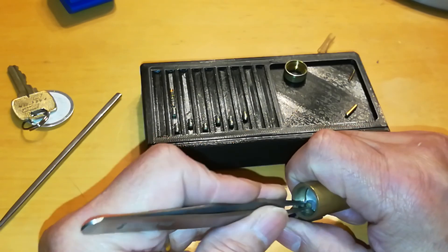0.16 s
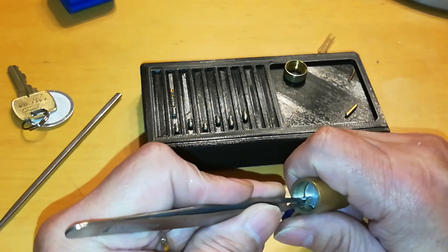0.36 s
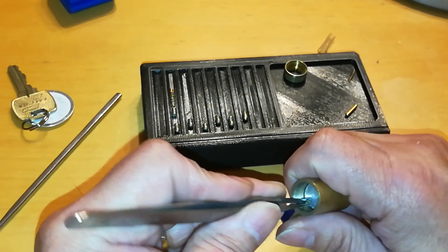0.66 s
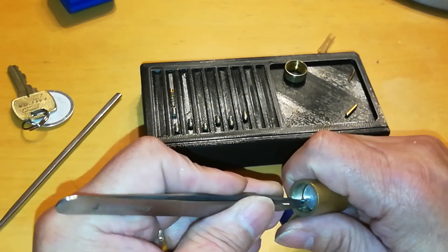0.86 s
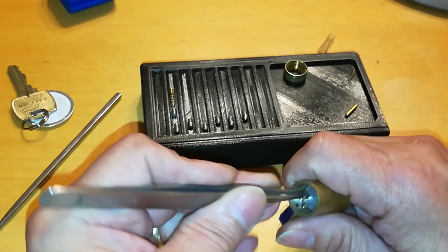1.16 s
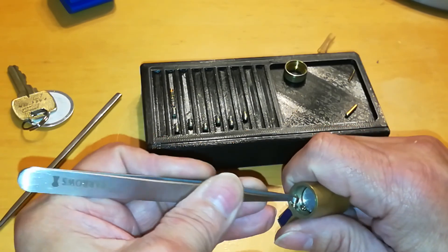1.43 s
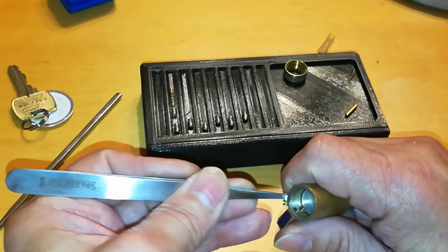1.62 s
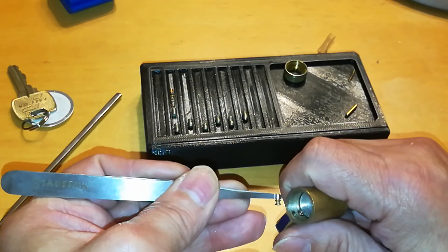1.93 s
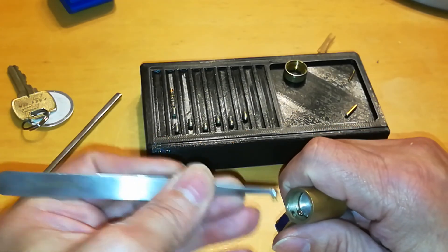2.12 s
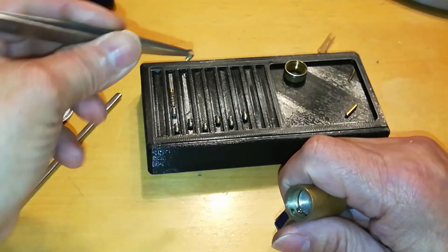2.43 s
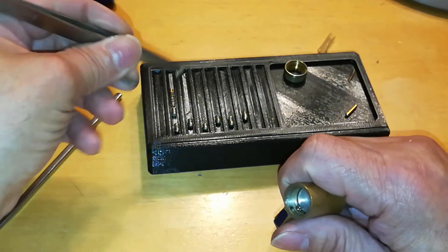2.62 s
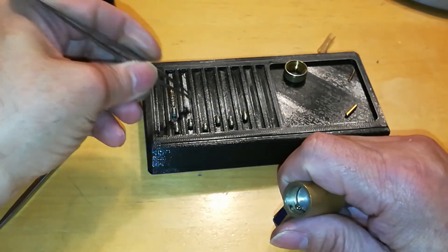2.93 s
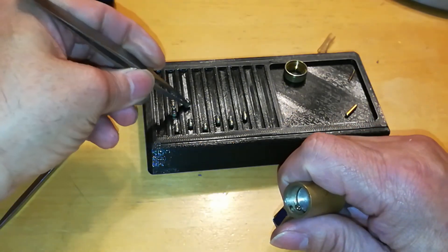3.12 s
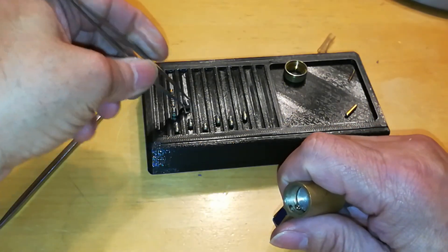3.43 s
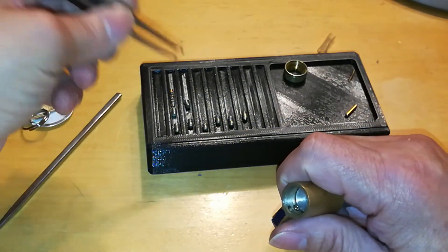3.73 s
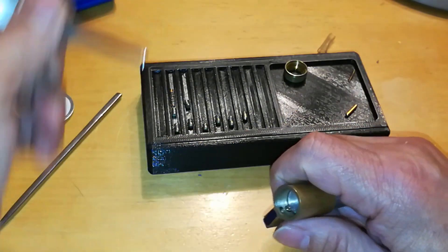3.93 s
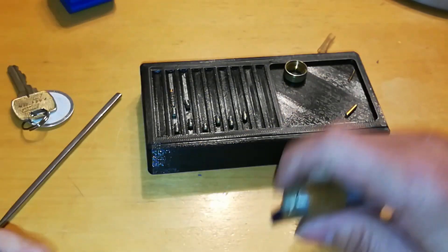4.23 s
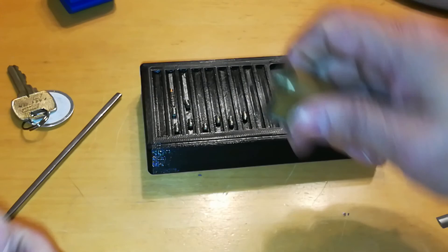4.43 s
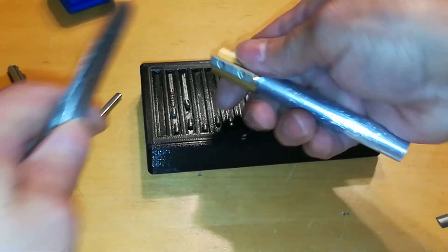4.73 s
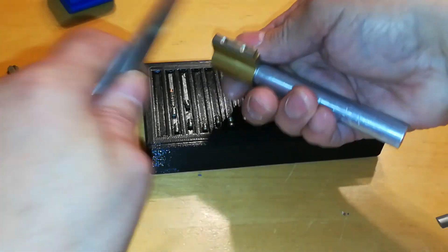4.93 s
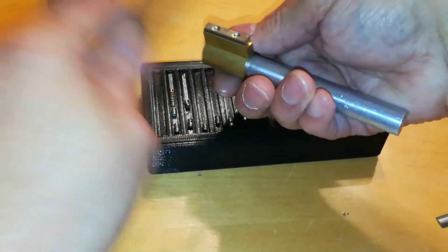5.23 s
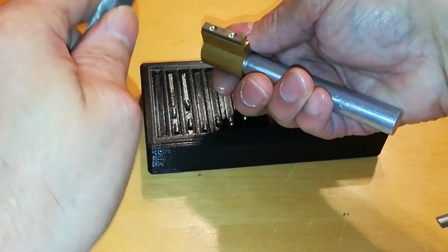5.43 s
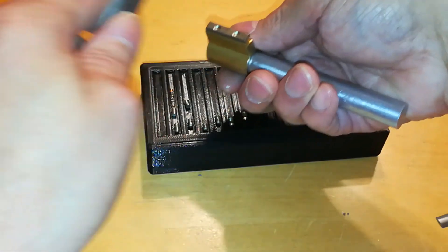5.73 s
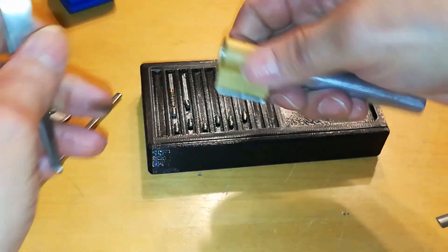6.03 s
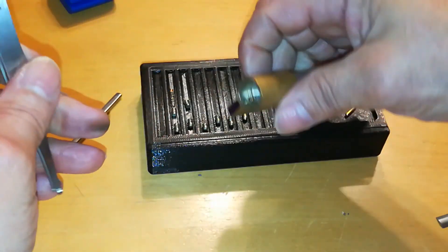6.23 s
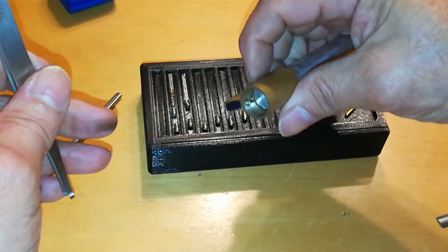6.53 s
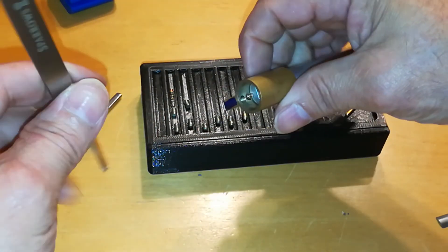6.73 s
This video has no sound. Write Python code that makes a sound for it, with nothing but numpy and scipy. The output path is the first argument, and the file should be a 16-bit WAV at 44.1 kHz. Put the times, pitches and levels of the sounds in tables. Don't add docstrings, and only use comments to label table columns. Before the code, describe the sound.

Close handling of tiny metal pins with steel tweezers in a small quiet room. Over low mains hum and hiss come faint ticks, one sharp knock on a wooden table, skin rustle and a pin bouncing in a hollow plastic tray. Near the end a thin bright click precedes two extremely loud steel snaps with short room tails, then near silence.

```python
import sys
import numpy as np
from scipy import signal
from scipy.fft import rfft, irfft
from scipy.io import wavfile

SR = 44100
rng = np.random.default_rng(int(sys.argv[2]) if len(sys.argv) > 2 else 0)


def waveform_to_disk(signal):
    frames = np.transpose(np.atleast_2d(signal))
    scaled = np.clip(frames, -1, 1) * 32767
    samples = np.round(scaled).astype(np.int16)
    wavfile.write(sys.argv[1], SR, samples)


def elevation(decibels):
    levels = np.asarray(decibels, float)
    return 10 ** (levels / 20)


N = 302526

# (frequency [Hz], side minus mid [dB])
SIDE_WIDTH = [(60, -20.5), (130, -8.5), (290, -5.5), (640, 7), (1410, -4), (3100, 2), (6820, 0), (15000, 1)]
# (time [s], peak [dB], left minus right [dB], chatter length [s])
PIN_LANDING = [
    (2.934, -40, -9, 0.0075),
    (2.9372, -30, 5, 0.00383),
    (2.944, -35, -13, 0.0066),
]


def evened(x):
    return x / np.sqrt(np.mean(x ** 2) + 1e-20)


def read(points, hz):
    f, value = np.transpose(points)
    return np.interp(np.log(hz + 1), np.log(f + 1), value)


def add(mix, s, sound):
    part = mix[:, round(s * SR):][:, :sound.shape[1]]
    part += sound[:, :part.shape[1]]


def band(x, lo_hz, hi_hz):
    return signal.sosfilt(signal.butter(2, [lo_hz, hi_hz], "bandpass", fs=SR, output="sos"), x)


def resonator(x, width_hz, rate):
    r = np.exp(-np.pi * width_hz / rate)
    return signal.lfilter([1], [1, -2 * r, r * r], x)


def causal(colour, pings=()):
    # (frequency [Hz], left minus right [dB])
    port_shading = [(300, -1), (1000, -1), (3000, .5), (5000, -2), (8000, -10), (14000, -15)]
    left_lag = 3
    hz = abs(np.fft.fftfreq(2048, 1 / SR))
    lift_db = sum(db / (1 + (2 * (hz - f) / width) ** 2) for f, width, db in pings)
    shading_db = np.outer([.5, -.5], read(port_shading, hz))
    log_gain = np.log(elevation(np.maximum(read(colour, hz), -70) + lift_db + shading_db))
    minimum_phase = np.exp(np.conj(signal.hilbert(log_gain)))
    left, right = np.fft.ifft(minimum_phase).real[:, :1024]
    return np.array([np.roll(left, left_lag), right])


def contact(peak_db, pan_db, chatter_s, response):
    same = 0.18
    t = np.arange(800) / SR
    shared, left, right = rng.standard_normal((3, len(t)))
    chatter = same * shared + (1 - same) * np.array([left, right])
    shocks = chatter * np.exp(-(t / chatter_s) ** 2)
    shocks[:, 0] = 3
    sound = signal.fftconvolve(response, shocks, axes=1)
    return elevation(peak_db + np.array([[pan_db], [0]])) * sound / abs(sound[1]).max()


def walls(colour, db, liveliness=1., rise_s=.006, bend=0.87, pings=()):
    # (frequency [Hz], t60 [s])
    room_decay = [(250, 0.084), (1000, 0.34), (2500, 0.22), (5000, 0.25), (11000, 0.21), (16000, 0.2)]
    hz, t, (mid, side) = signal.stft(rng.standard_normal((2, 16384)), SR, nperseg=128)
    side = side * elevation(read(SIDE_WIDTH, hz))[:, None]
    t60 = liveliness * read(room_decay, hz)[:, None]
    decay_db = -60 * (t / t60) ** bend
    tail = signal.istft(np.array([mid + side, mid - side]) * elevation(decay_db - 3), SR, nperseg=128)[1]
    tail = tail * (1 - np.exp(-(np.arange(tail.shape[1]) / SR / rise_s) ** 2))
    response = causal(colour, pings)
    return elevation(db) * signal.fftconvolve(tail, response / np.linalg.norm(response[1]), axes=1)


def struck(contacts, colour, rings, far):
    out, response, t = np.zeros((2, N)), causal(colour), np.arange(8000) / SR
    first_s, first_db = contacts[0][:2]
    for s, peak_db, pan_db, chatter_s in contacts:
        add(out, s, contact(peak_db, pan_db, chatter_s, response))
    for hz, db, t60, pan_db in rings:
        decay = elevation(first_db + db - 60 * t / t60)
        ring = decay * np.sin(2 * np.pi * hz * t) * (1 - np.exp(-t / .0005))
        add(out, first_s, elevation(np.array([[pan_db], [0]])) * ring)
    add(out, first_s, far)
    return out


def noise(colour, db):
    hz = np.fft.rfftfreq(N, 1 / SR)
    spectra = rfft(rng.standard_normal((2, N))) * elevation(read(colour, hz))
    mid, side = irfft(spectra * elevation([0 * hz, read(SIDE_WIDTH, hz)]), N)
    return elevation(db) * np.array([mid + side, mid - side]) / np.std(mid)


def hiss():
    # (frequency [Hz], density [dB per Hz])
    hiss_colour = [(150, -29.5), (260, -8.5), (367, -5.5), (444, -13.5), (484, -12), (617, -18.5),
                   (1150, -14), (2410, -20), (3240, -22), (14300, -25.5), (16100, -28.5)]
    return noise(hiss_colour, db=-75.5)


def rumble():
    # (frequency [Hz], density [dB per Hz])
    rumble_colour = [(8, -12), (20, 0), (45, -11.5), (85, -5.5), (140, -6.5), (270, -8), (330, -34)]
    return noise(rumble_colour, db=-72.5)


def hum():
    # (frequency [Hz], level [dB], waver width [Hz])
    hum_lines = [
        (30.5, -74, 4.69),
        (58.6, -67.5, 1.75),
        (118.6, -68.5, 10),
        (193, -78, 10),
        (238.3, -78.5, 3),
    ]
    step = 64
    t, slow, out = np.arange(N) / SR, np.arange(0, N + step, step) / SR, 0
    for line_hz, db, width_hz in hum_lines:
        waver = resonator(rng.standard_normal((2, len(slow))), width_hz, SR / step)
        a, b = evened(waver)
        steady = np.clip(1.6 / width_hz, 0, 1)
        in_phase = steady + (1 - steady) * np.interp(t, slow, a)
        quadrature = (1 - steady) * np.interp(t, slow, b)
        turn = 2 * np.pi * line_hz * t
        out = out + elevation(db) * evened(in_phase * np.cos(turn) + quadrature * np.sin(turn))
    return out


def desk():
    # (start [s], length [s], first level [dB], last level [dB])
    groan = (3.25, .28, -70, -61)
    s, length, first_db, last_db = groan
    out, count = np.zeros((2, N)), round(length * SR)
    moan = evened(band(rng.standard_normal(SR), lo_hz=118.4, hi_hz=136))[:count]
    moan = moan * elevation(np.linspace(first_db, last_db, count))
    add(out, s, np.array([moan, moan]) * signal.windows.tukey(count, .2))
    return out


def slide():
    # (start [s], length [s], level [dB])
    stroke = (3.99, .3, -79)
    s, length, db = stroke
    out, count = np.zeros((2, N)), round(length * SR)
    fizz = evened(band(rng.standard_normal((2, SR)), lo_hz=4530, hi_hz=16000))[:, :count]
    add(out, s, elevation(db) * fizz * signal.windows.tukey(count, .6))
    return out


def peel():
    # (time of most pressure [s], level [dB], final squeak [Hz], fizz [dB], low rustle [dB])
    hand_peels = [
        (2.09, -72.5, 2656, -14, 4.5),
        (4.204, -69, 2840, -1.5, -6.5),
    ]
    rise_s, fall_s = .028, .04
    squeak_start, squeak_width_hz, squeak_db = .9, 130, -1
    t, out = np.arange(-.2, .3, 1 / SR), np.zeros((2, N))
    pressure = np.exp(-(t / np.where(t < 0, rise_s, fall_s)) ** 2 / 2)
    climb = squeak_start + (1 - squeak_start) * (1 + np.tanh(t / rise_s)) / 2
    for s, db, hz, fizz_db, low_db in hand_peels:
        a, b, c, d, e = rng.standard_normal((5, 2, len(t)))
        turn = np.exp(2j * np.pi * np.cumsum(hz * climb) / SR)
        fuzz = resonator(a + 1j * b, squeak_width_hz, SR)
        squeak = elevation(squeak_db) * evened((turn * fuzz).real)
        dull = evened(band(c, lo_hz=1700, hi_hz=2730))
        low = elevation(low_db) * evened(band(d, lo_hz=774, hi_hz=1770))
        fizz = elevation(fizz_db) * evened(band(e, lo_hz=4530, hi_hz=16090))
        add(out, s + t[0], elevation(db) * pressure * (squeak + dull + low + fizz))
    return out


def palm_thumps():
    # (time [s], peak [dB], left minus right [dB], chatter length [s])
    palm_contacts = [
        (5.999, -48, 0, .003),
        (2.31, -58, 0, .008),
    ]
    # (frequency [Hz], density [dB per Hz])
    palm_colour = [(120, -5), (300, 1), (500, -0.5), (800, -14), (1500, -28), (4000, -35), (9000, -59)]
    return struck(palm_contacts, palm_colour, [], walls(palm_colour, db=-66.0))


def pin_ticks():
    # (time [s], peak [dB], left minus right [dB], strongest ring [Hz], wide shock under the ring [dB])
    taps = [(0.042, -53, 3, 9260, -7), (0.053, -58, 0, 10300, -15), (0.0648, -48.5, 4, 9800, -4),
            (0.187, -65, -5, 12900, -17), (0.245, -63, 11, 5340, -16), (0.266, -59, 3, 2260, -8),
            (0.8636, -33.5, -10.5, 9600, -5), (3.153, -56.5, 11, 9600, -16), (3.1597, -52.5, 7, 10200, -12),
            (3.1636, -46.5, -16, 9700, -11), (3.3614, -63, 0, 4300, -13), (3.9715, -56, -4, 5300, -12),
            (3.9765, -54, -1, 7200, -4), (4.079, -52, 7, 15600, -13), (4.22, -47, -5, 9000, -11),
            (4.5714, -56, -6, 14200, -19), (4.583, -54.5, 4, 15600, -6)]
    spread = .07
    out = np.zeros((2, N))
    for s, peak_db, pan_db, hz, wide_db in taps:
        colour = [(600, -26), (1200, wide_db - 7), ((1 - spread) * hz, wide_db), (hz, 0),
                  ((1 + spread) * hz, wide_db), (22000, wide_db - 11.5)]
        add(out, s, contact(peak_db + 5.0, pan_db, chatter_s=.0024, response=causal(colour)))
        add(out, s, walls(colour, db=peak_db - 12.5, liveliness=0.75))
    return out


def table_knock():
    # (time [s], peak [dB], left minus right [dB], chatter length [s])
    knock_contacts = [
        (.8948, -17, 0.0032, 0.00011),
        (.8976, -32.5, 0.0082, 0.00053),
        (.8992, -29, 0, 0.00048),
    ]
    # (frequency [Hz], density [dB per Hz])
    wood = [(88, -39.5), (150, -13.5), (360, -0.5), (600, -15.5), (1250, 3), (1750, 4), (2300, -14),
            (3300, -7.5), (5500, -12), (7000, -37), (16000, -44.5)]
    wood_far = [(88, -22), (280, 1), (448, -2), (534, -12), (689, -3), (905, -7.5), (1120, -7.5),
                (1240, -6.5), (1790, -10), (2600, -21.5), (3550, -23), (5000, -29.5), (16000, -61.5)]
    # (frequency [Hz], level under the peak [dB], t60 [s], left minus right [dB])
    wood_rings = [(940, -17, .07, 0), (1620, -24, .05, 0)]
    far = walls(wood_far, db=-32.5, liveliness=0.86, rise_s=0.0059, bend=1.0)
    return struck(knock_contacts, wood, wood_rings, far)


def tray_boom():
    # (frequency [Hz], level [dB], t60 [s], rise [s], damped after [s])
    hollow = (248, -44, .45, .022, .1)
    hz, db, t60, rise_s, damped_s = hollow
    t, out = np.arange(9000) / SR, np.zeros((2, N))
    swell = (1 - np.exp(-(t / rise_s) ** 2)) * np.exp(-(t / damped_s) ** 8)
    ring = elevation(db - 60 * t / t60) * swell * np.sin(2 * np.pi * hz * t)
    add(out, PIN_LANDING[0][0], np.array([ring, ring]))
    return out


def pin_drop():
    # (frequency [Hz], density [dB per Hz])
    tray = [(88, -44), (150, -7), (1150, 0.5), (1480, -4.5), (1780, -5.5), (2570, -20), (2920, -18),
            (3260, -4.5), (4070, -18), (5870, -22), (7050, -47), (9110, -31), (12000, -35), (15600, -44.5),
            (22000, -62)]
    tray_far = [(180, -50), (300, 5.5), (523, -6), (639, -11), (757, -11), (1380, -13), (1720, -16),
                (2450, -19), (3280, -21), (4400, -27), (12000, -45), (15600, -67), (22000, -120)]
    # (frequency [Hz], level under the peak [dB], t60 [s], left minus right [dB])
    tray_rings = [(3390, -11, 0.052, 0.1), (1727, -4, 0.068, 0.1), (785, -4, 0.055, 4),
                  (1106, 1, 0.053, 0.1)]
    # (frequency [Hz], width [Hz], lift [dB])
    tray_pings = [(3250, 200, 6.6), (1690, 120, 9)]
    far = walls(tray_far, db=-45.5, liveliness=0.77, rise_s=0.0032, bend=1.34, pings=tray_pings)
    return struck(PIN_LANDING, tray, tray_rings, far)


def tip_tweak():
    # (time [s], peak [dB], left minus right [dB], chatter length [s])
    tip_contacts = [
        (4.9116, -14.5, 0.042, 0.0014),
        (4.9126, -9, -1.5, 0.0025),
    ]
    # (frequency [Hz], density [dB per Hz])
    tip_steel = [(530, -80), (900, -35), (2510, -31.5), (3240, -12.5), (3830, -21.5), (5510, -8),
                 (6220, -19.5), (6850, -2.5), (8310, -14), (9600, -8.5), (10200, -18), (12100, 1),
                 (13300, -15.5), (15200, 1.5), (16100, -11)]
    tip_steel_far = [(880, -57), (1500, -30), (2280, -21), (2420, -33), (3010, -10.5), (4750, -8.5),
                     (6220, -17), (6930, -5.5), (8290, -15), (9530, -4.5), (10300, -14), (11700, -7),
                     (16100, -2)]
    # (frequency [Hz], level under the peak [dB], t60 [s], left minus right [dB])
    tip_rings = [(4805, -27.5, 0.06, -3), (6760, -25.5, 0.091, -17), (9900, -35, .15, -15),
                 (12270, -24, 0.04, -18), (14350, -23.5, .08, -16), (15430, -19, .07, -18)]
    # (frequency [Hz], width [Hz], lift [dB])
    tip_pings = [(4870, 100, 9), (6920, 80, 8), (9500, 150, 7), (12150, 100, 12), (14200, 250, 5.5),
                 (3300, 1200, -8)]
    far = walls(tip_steel_far, db=-27.5, liveliness=0.88, pings=tip_pings)
    return struck(tip_contacts, tip_steel, tip_rings, far)


def first_snap():
    # (time [s], peak [dB], left minus right [dB], chatter length [s])
    snap_contacts = [
        (5.1846, 5, 7, 0.0036),
        (5.1862, -4.5, -3, 0.0022),
        (5.1881, 9.5, -4, 0.0012),
        (5.1929, -1, -4, .0007),
        (5.1953, -7.5, -7.5, 0.00065),
    ]
    # (frequency [Hz], density [dB per Hz])
    jaws = [(60, -65), (400, -32.5), (1300, -42.5), (2100, -18.5), (3400, -28.5), (4200, -2.5),
            (4900, -7.5), (5600, -1), (6450, -18), (7100, -7), (9000, -11.5), (11200, -3), (13000, -13.5),
            (15200, -2), (16300, -11.5)]
    jaws_far = [(290, -69.5), (500, -25), (650, -51.5), (785, -32), (1130, -43), (1800, -28), (2400, -46.5),
                (2660, -25), (2990, -12), (4120, -9), (5580, -14), (9700, -11), (10900, -3), (12600, -14.5),
                (16100, -13)]
    # (frequency [Hz], level under the peak [dB], t60 [s], left minus right [dB])
    jaw_rings = [(4207, -23.5, 0.03, 3), (4570, -42.5, 0.2, -5.5), (5697, -33.5, 0.18, -6),
                 (7126, -34, 0.17, -7.5), (11010, -29.5, 0.23, -10.5), (10240, -34.5, .15, -9),
                 (11590, -32, .13, -10), (10437, -33, .12, -9.5)]
    # (frequency [Hz], width [Hz], lift [dB])
    jaw_pings = [(4225, 90, 8), (5600, 180, 10), (7140, 90, 7), (8050, 120, 4.5), (10350, 120, 2),
                 (11000, 250, 5.5), (14600, 500, 3.5), (3200, 900, -11.5)]
    far = walls(jaws_far, db=-11.0, liveliness=0.99, rise_s=0.0093, pings=jaw_pings)
    return struck(snap_contacts, jaws, jaw_rings, far)


def second_snap():
    # (time [s], peak [dB], left minus right [dB], chatter length [s])
    snap_contacts = [
        (5.4453, 5, -2, 0.0016),
        (5.448, 2, 5.5, 0.0019),
        (5.4493, 3.5, -0.5, .0022),
        (5.4563, -9.5, -8.5, .001),
    ]
    # (frequency [Hz], density [dB per Hz])
    jaws = [(59, -58), (130, -32.5), (1370, -26.5), (2090, -26.5), (2940, -4.5), (3490, -19.5), (3720, -6),
            (4900, -4), (5600, 2.5), (7670, -7.5), (9090, -6.5), (11200, -4.5), (13600, -23.5), (14800, -6),
            (16100, -12.5)]
    jaws_far = [(290, -67), (500, -26.5), (679, -76), (730, -54), (1030, -42), (2170, -32.5), (2620, -19.5),
                (4830, -11), (5420, -5.5), (8270, -6.5), (9290, -14), (11100, -2), (13000, -19.5),
                (14400, -7), (16100, -15)]
    # (frequency [Hz], level under the peak [dB], t60 [s], left minus right [dB])
    jaw_rings = [(5440, -20, 0.051, -5), (11970, -32.5, .17, -10.5), (11390, -16.5, 0.041, -7.5),
                 (14040, -16.5, .02, -11), (15300, -14.5, .025, -17)]
    # (frequency [Hz], width [Hz], lift [dB])
    jaw_pings = [(5670, 310, 6.5), (8500, 300, 3), (11150, 190, 8), (14600, 411, 4)]
    far = walls(jaws_far, db=-16.5, liveliness=0.96, rise_s=0.01, bend=1.1, pings=jaw_pings)
    return struck(snap_contacts, jaws, jaw_rings, far)


def scene():
    floor = hiss() + rumble() + hum()
    handling = desk() + slide() + peel() + palm_thumps()
    small_hits = pin_ticks() + table_knock() + tray_boom() + pin_drop()
    tweezers = tip_tweak() + first_snap() + second_snap()
    return floor + handling + small_hits + tweezers


def roll_off(x):
    return signal.sosfilt(signal.butter(12, 16290, fs=SR, output="sos"), x)


def record(dry):
    # (time [s], step [dB])
    gain_steps = [
        (5.19, 0.04),
        (5.455, -5),
    ]
    gain_db, back_off_s, recover_db_per_s = -1.12, .06, 1.9
    for s, step_db in gain_steps:
        since = np.maximum(np.arange(N) / SR - s, 0)
        gain_db = gain_db + step_db * (1 - np.exp(-since / back_off_s))
        gain_db = gain_db + recover_db_per_s * since / 2
    clipped = np.clip(dry * elevation(gain_db), -.97, .97)
    band_limit = signal.firwin(255, 16350, window=("kaiser", 8), fs=SR)
    return roll_off(signal.oaconvolve(clipped, band_limit[None], "same"))


dry = scene()
out = record(dry)
waveform_to_disk(out)
```